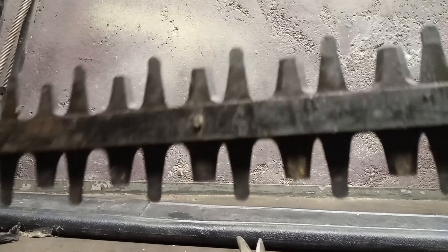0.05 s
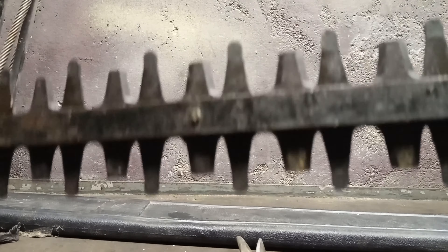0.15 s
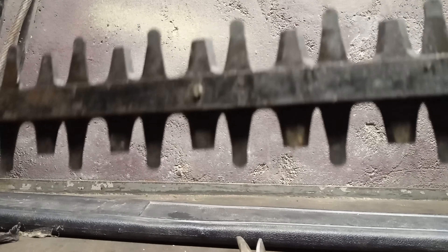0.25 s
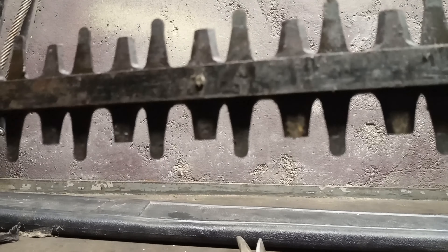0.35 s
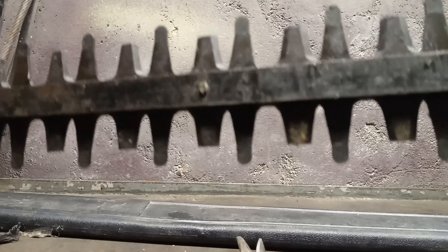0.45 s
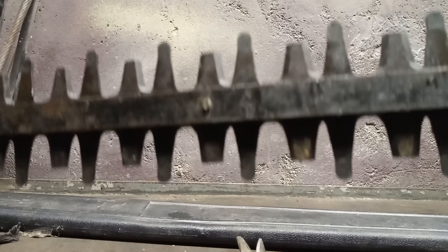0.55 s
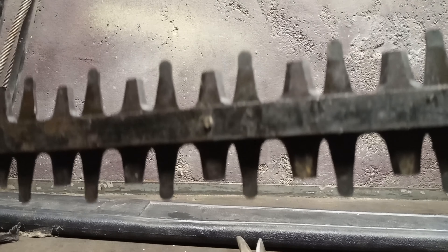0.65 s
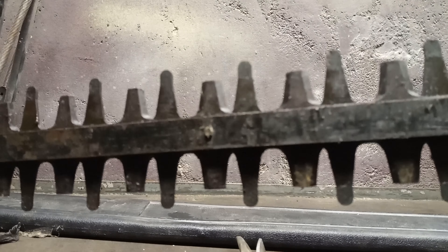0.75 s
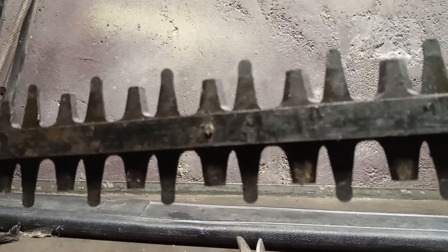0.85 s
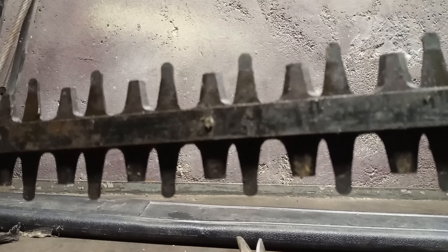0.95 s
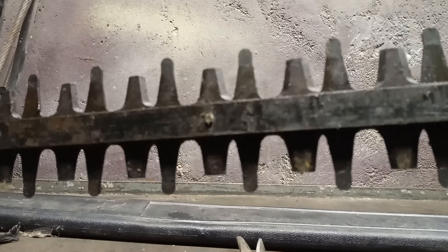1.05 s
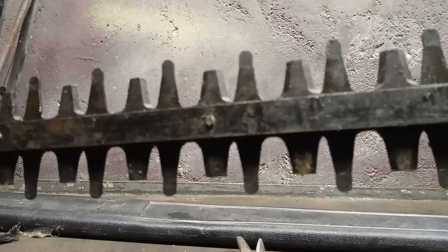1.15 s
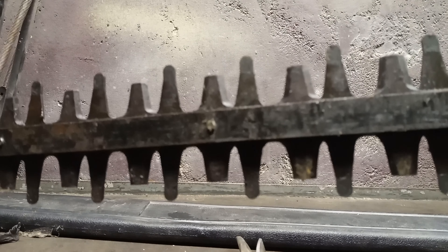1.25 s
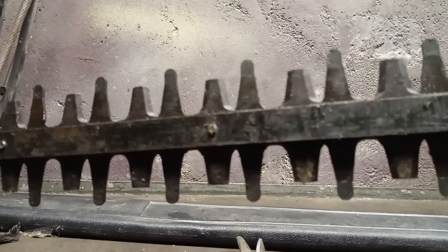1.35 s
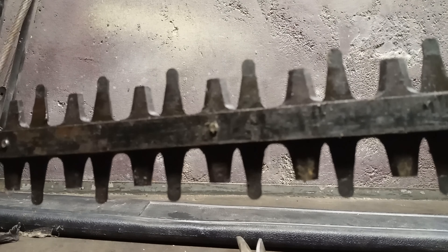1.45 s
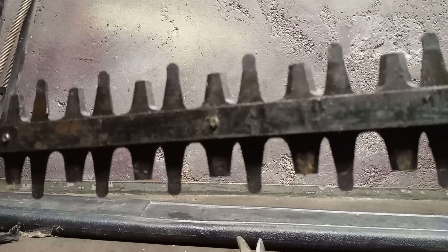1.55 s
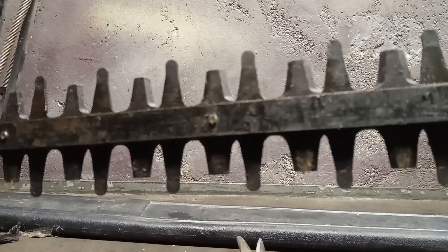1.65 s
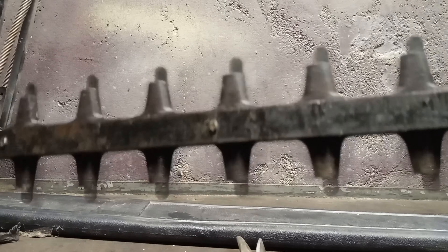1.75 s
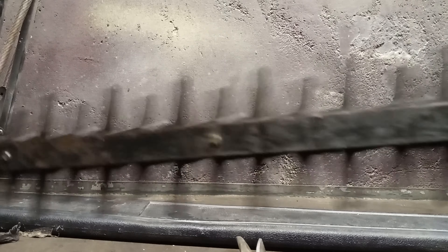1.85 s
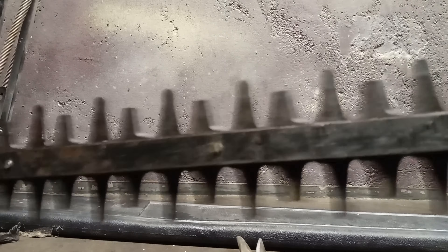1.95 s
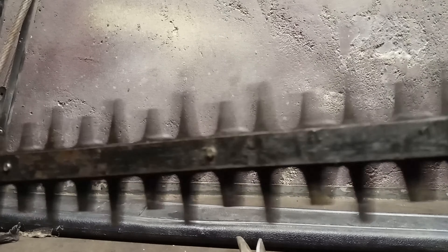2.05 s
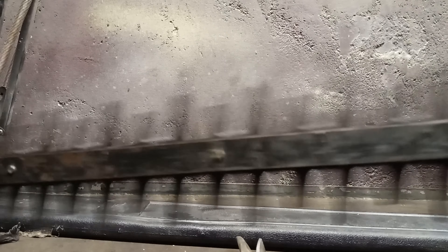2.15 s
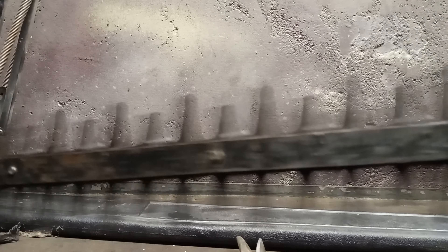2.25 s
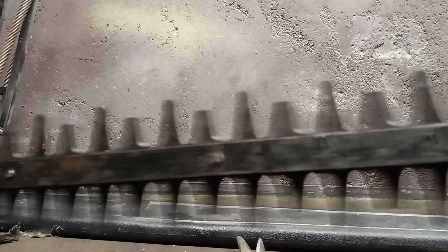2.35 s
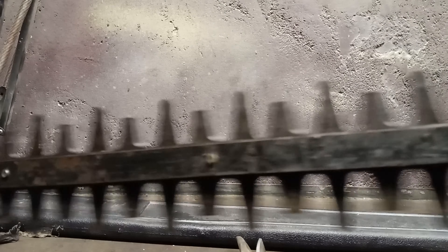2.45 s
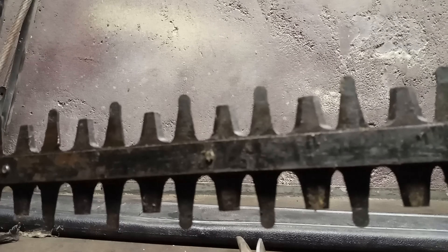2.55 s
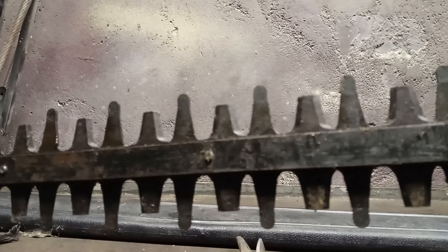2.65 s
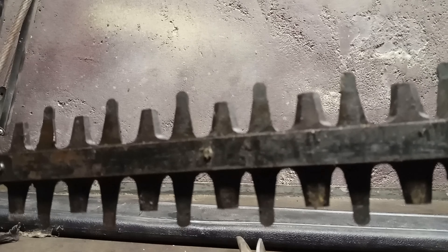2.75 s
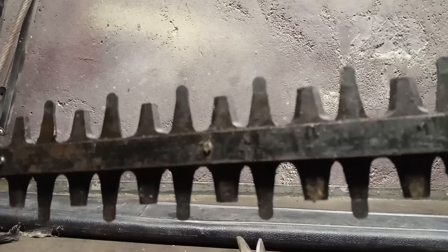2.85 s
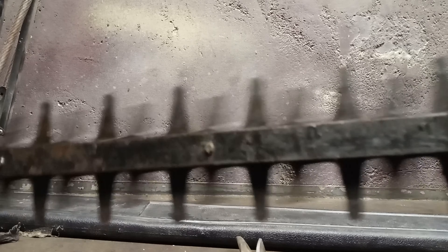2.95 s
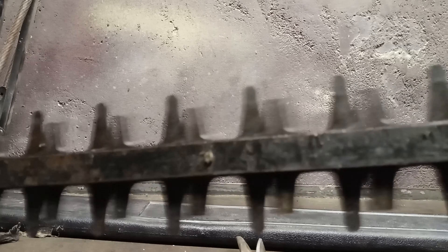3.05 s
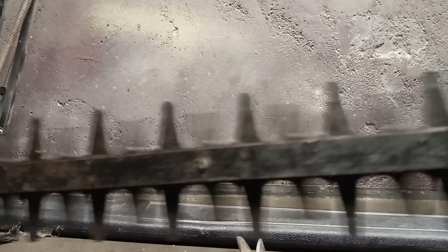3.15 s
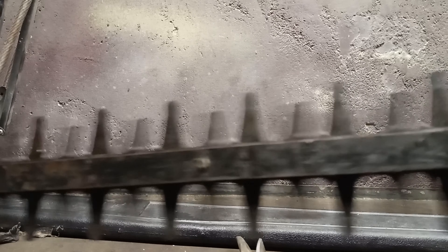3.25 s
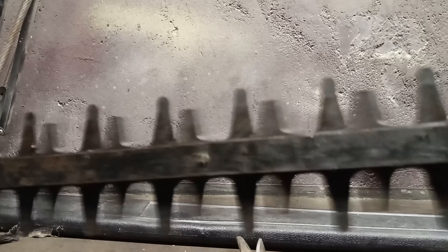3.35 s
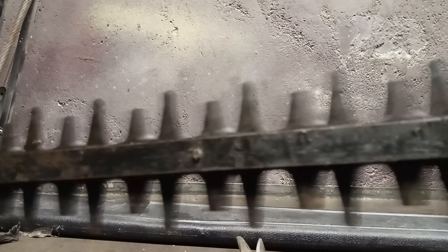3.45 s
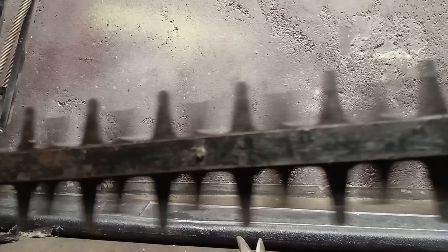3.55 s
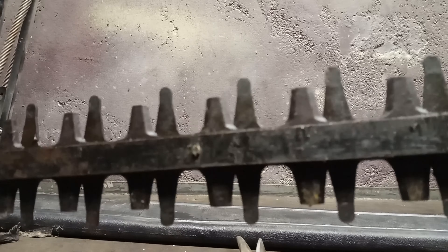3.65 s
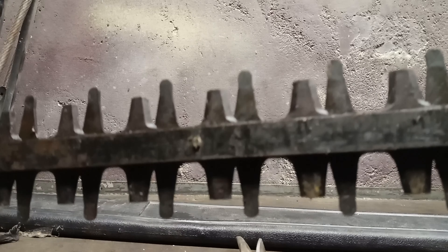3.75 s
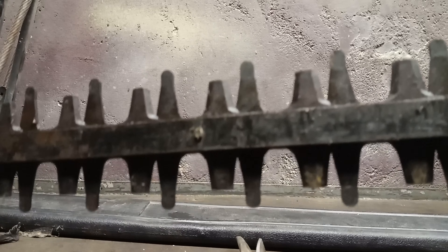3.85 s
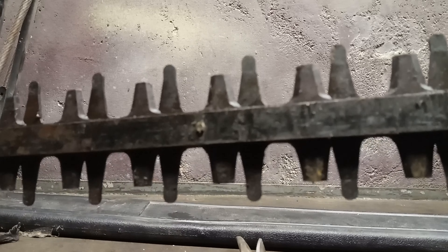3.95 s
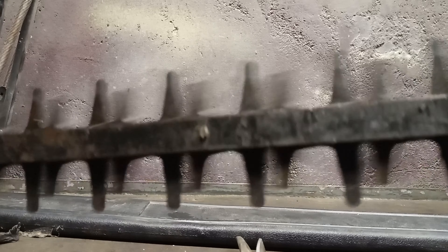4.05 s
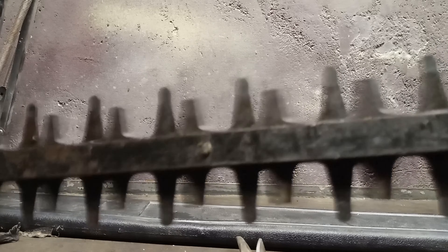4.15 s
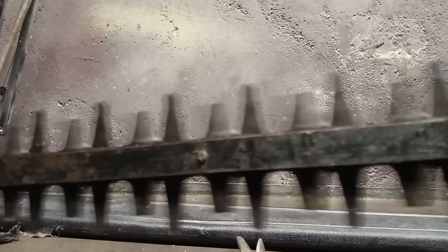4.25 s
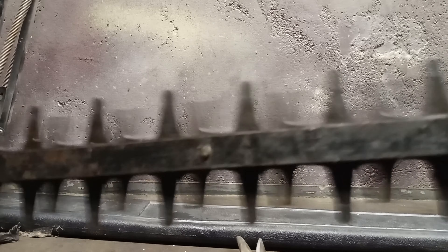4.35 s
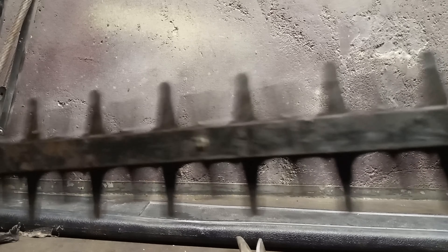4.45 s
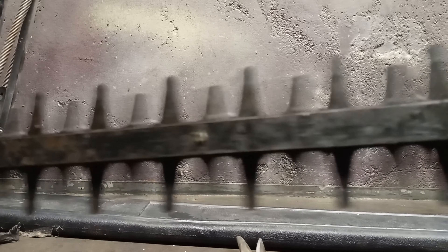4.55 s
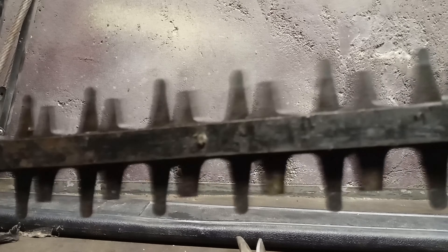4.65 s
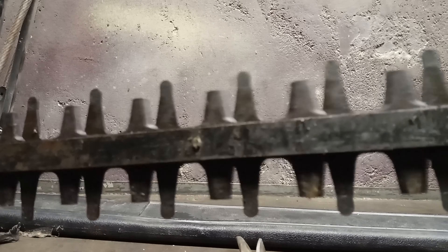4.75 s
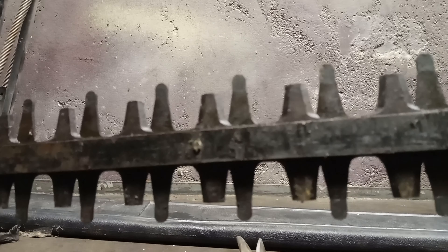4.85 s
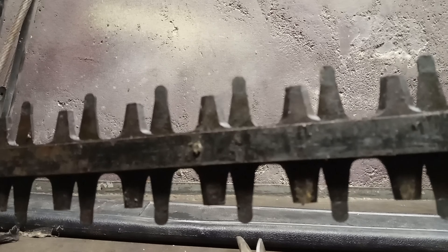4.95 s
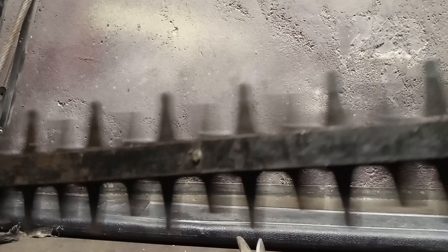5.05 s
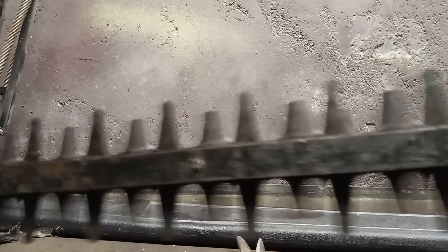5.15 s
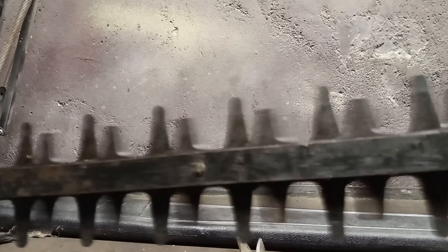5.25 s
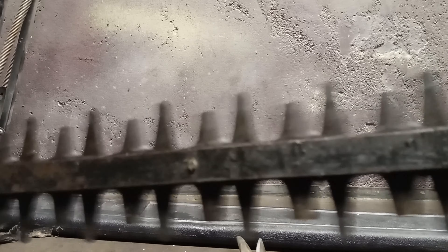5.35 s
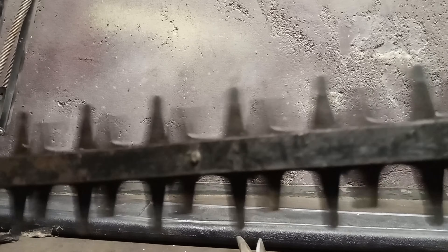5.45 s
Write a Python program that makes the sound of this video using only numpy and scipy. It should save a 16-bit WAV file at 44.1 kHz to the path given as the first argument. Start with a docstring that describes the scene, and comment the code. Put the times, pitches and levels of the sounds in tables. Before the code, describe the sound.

After light handling and a latch snap, a hedge trimmer starts and stops in four close bursts of whining, scraping metallic clatter.

```python
"""In a small workshop with hard walls, an electric hedge trimmer is handled, then run four times.
Hands tap its plastic housing and a latch snaps. On each run the gears whine up to speed, steel scrapes
on steel, and the blade clacks at each end of its stroke. One close microphone picks it all up,
and a fast limiter (an automatic volume control) squeezes the loud bursts."""
import sys
import numpy as np
from scipy import signal
from scipy.io import wavfile
from scipy.ndimage import uniform_filter1d

SR = 44100
rng = np.random.default_rng(int(sys.argv[2]) if len(sys.argv) > 2 else 0)


def int16_out(signal):
    """Quantize to a 16-bit WAV file."""
    q = np.round(np.clip(np.atleast_2d(signal).T, -1, 1) * 32767)
    wavfile.write(sys.argv[1], SR, q.astype(np.int16))


N = 243431

# The quiet noise of the room. Each row: frequency in Hz, level in dB.
ROOM_COLOUR = [(18, -61), (30, -38), (93, -3.5), (232, -15), (271, -10), (424, -15), (735, -20),
               (860, -19.5), (1010, -19.5), (3940, -23.5), (11500, -37), (15800, -24.5)]
# The echo of the walls. Each row: frequency in Hz, seconds to fade by 60 dB.
ECHO_TIMES = [(150, 0.42), (400, 0.24), (1040, 0.3), (2760, 0.31), (7280, 0.21), (14000, 0.12)]
# A short low hum. Each row: time in seconds, pitch in Hz, level in dB.
HUM_PATH = [(0, 138, -56), (.008, 132, -39), (.048, 146, -49), (.062, 145, -81)]
# Hands on the housing and switch. Each row: start in seconds, level in dB, centre frequency in Hz,
# hollow low part in dB, treble in dB, fade time in seconds.
HAND_TAPS = [(.006, -37, 1100, -55, -26.5, 0.0016), (0.019, -38.5, 1140, -51, -25.5, 0.013),
             (.048, -42.5, 850, -40, -20, 0.017), (0.067, -29.5, 1150, -53, -29, 0.021),
             (0.072, -27, 820, -49, -21, 0.0048), (.33, -46, 1500, 2, -23, .012),
             (0.962, -37.5, 1240, -5, -36, 0.0064), (0.997, -50, 1400, -33, -24, 0.003),
             (1.021, -39, 1496, -20.5, -25, 0.01), (1.099, -34.5, 1460, -8.5, -13, 0.0023),
             (1.107, -36, 1870, -31, -30, 0.013), (1.324, -43, 1730, -6, -17.5, 0.011),
             (1.346, -45, 1930, -28, -24, 0.036)]
# The ways the plastic housing rings. Each row: frequency in Hz, width in Hz, level in dB.
HOUSING_RINGS = [(426, 45, -3.5), (720, 66, -17), (797, 280, 11.5), (1066, 92, 7.5), (1310, 250, 5.5),
                 (1613, 77, 2), (2170, 260, 1.5), (3000, 290, -0.5), (2980, 280, 7), (4320, 440, 9.5),
                 (5200, 320, 12), (6050, 220, -3), (6830, 760, 7)]
# A latch snaps and settles. Each row: start in seconds, level in dB, fade time in seconds.
LATCH_SNAPS = [(0.3216, -5, 0.0024), (0.325, -36, 0.0029), (0.34, -54.5, 0.0025)]
# The tone of the latch. Each row: frequency in Hz, level in dB.
LATCH_COLOUR = [(180, -51), (300, -21), (812, -46), (1550, -6), (1830, -22.5), (2020, -3), (2860, -13.5),
                (3160, -5), (6350, -6), (12100, -25.5), (15800, -26.5)]
# The notes of the free blade. Each row: pitch in Hz, level in dB, seconds to fade by 60 dB.
BLADE_NOTES = [(2234, 0, .9), (2719, -8, .6), (2778, -3, 1.1), (4064, -10, .4)]
# A clack that leaves the blade ringing. Each row: start in seconds, level in dB.
RING_STARTS = [(3.82, -39)]
# The ways the gearbox and blade bar ring. Each row: frequency in Hz, width in Hz, level in dB.
BODY_RINGS = [(403, 71, 5), (751, 190, -3), (1162.5, 31, 2.5), (1620, 34, -1.5), (2220, 170, -35),
              (3170, 36, -31), (3085, 19, -2.5), (5130, 220, -23), (5730, 24, -48), (5940, 76, -0.5),
              (7140, 720, -4.5)]
# Start-up clunks. Each row: start in seconds, level in dB, centre and width in Hz, fade time in seconds.
START_CLUNKS = [(1.818, -13, 390, 403, 0.011), (2.996, 5.5, 784, 1110, 0.01), (3.005, 0.5, 480, 400, 0.016),
                (4.118, 10, 740, 504, 0.0053), (4.155, 3, 1120, 300, 0.019), (5.06, -4, 714, 910, 0.012),
                (5.095, -17, 1140, 392, 0.023)]
# Motor runs. Each row: switch-on, switch-off and standstill in seconds, full-speed pitch in Hz,
# speed-up and slow-down times in seconds, upward drift in Hz per second, whine level in dB,
# extra for the whine's third tone in dB, scrape level in dB.
MOTOR_RUNS = [(1.81, 2.456, 2.66, 931.7, .07, 0.13, 96, -19.5, 8.5, -19.5),
              (2.99, 3.608, 3.83, 973.3, 0.072, .17, 40.8, -19.5, 1, -18.5),
              (4.112, 4.713, 4.93, 990, .085, .165, 20, -20.5, 3.5, -18.5),
              (5.057, 5.57, 5.7, 977, 0.087, 0.22, 76, -21.5, -3, -19.5)]
# The tones of meeting gear teeth. Each row: multiple of the gear pitch, level in dB.
GEAR_TONES = [(1, -0.5), (2, -3.5), (3, -14)]
# How well the casing gives off those tones. Each row: frequency in Hz, level in dB.
CASING_COLOUR = [(250, -17), (600, -2.5), (1200, 4), (1600, -10), (2500, 2), (2950, 0)]
# The tone of sliding steel. Each row: frequency in Hz, level in dB.
SCRAPE_COLOUR = [(30, -44.5), (150, -13.5), (390, -9), (700, -9.5), (1400, -4.5), (2200, -3), (3700, -4),
                 (4900, -4), (8500, -11.5), (13300, -31), (15000, -22), (15800, -18.5)]
# The blade slams in its guide. Each row: time in seconds, stroke end (0 or 1), blow level in dB,
# weight (the level of the lower rings) in dB, rattle time in seconds.
BLADE_BLOWS = [(1.8128, 0, -3, -29, 0.0017), (1.8207, 0, -1.5, -7.5, .012), (1.8492, 0, -15.5, -13, 0.017),
               (1.8664, 1, -7, -9.5, 0.0067), (1.8845, 1, -12, -13.5, 0.0072),
               (1.9289, 0, -3.5, -12.5, 0.016), (1.9561, 0, -29, -21, 0.0026), (1.9684, 1, 3, -18, 0.0058),
               (2.0065, 0, -0.5, -11.5, 0.0073), (2.0313, 0, -19, -16, 0.016), (2.0445, 1, 2.5, -10, .0065),
               (2.0806, 0, -5, -13, 0.012), (2.1201, 1, 3.5, -9.5, 0.0054), (2.1583, 0, -1, -10.5, 0.0063),
               (2.1944, 1, -5, -8.5, 0.0045), (2.2206, 1, -14, -30, 0.0031), (2.2314, 0, -2, -10.5, 0.012),
               (2.2687, 1, 0.5, -8, 0.0025), (2.3045, 0, -4, -12, 0.014), (2.3406, 1, -1, -6.5, 0.0028),
               (2.379, 0, -5.5, -13, 0.022), (2.4152, 1, -11.5, -20, 0.013), (2.4512, 0, -1, -11, 0.0083),
               (2.4922, 1, -1.5, -3.5, 0.0058), (2.5308, 0, -19, -13, 0.01), (2.557, 0, 7.5, -12, 0.0065),
               (2.616, 0, -25, -25.5, 0.036), (2.9889, 0, -7, -7, 0.043), (2.9984, 0, -22.5, -12, .007),
               (3.0266, 0, -29, -28, 0.0037), (3.049, 0, 5.5, -10, .011), (3.088, 1, -11, -11.5, 0.026),
               (3.134, 0, 0.5, -16, 0.012), (3.17, 1, -3.5, -7, 0.011), (3.2102, 0, 2.5, -9, 0.013),
               (3.248, 1, 2, -19, 0.005), (3.286, 0, 2, -10, .0075), (3.3199, 1, 1, -9, 0.0058),
               (3.3563, 0, 2.5, -29, 0.0085), (3.3917, 1, 1.5, -9.5, 0.0073), (3.4294, 0, -1, -14, 0.0087),
               (3.464, 1, -3, -13, 0.0092), (3.5, 0, 2, -10, 0.0096), (3.5358, 1, -3, -15, 0.0079),
               (3.5722, 0, -0.5, -12.5, 0.013), (3.6087, 1, -1.5, -17, 0.0075), (3.6485, 0, 1.5, -11, 0.01),
               (3.692, 0, -24, -15, 0.0049), (3.708, 1, -13.5, -15.5, 0.017),
               (3.7595, 0, -20, -19.5, 0.0086), (3.774, 0, -16, -29, 0.004), (3.821, 1, -12.5, -12, 0.0076),
               (4.1183, 0, 6, 3.5, 0.01), (4.145, 0, -0.5, -4, 0.03), (4.1878, 0, -5, -19, 0.03),
               (4.242, 0, 6.5, -25, 0.0049), (4.2803, 1, -2, -8, 0.014), (4.3162, 0, -1, -27, 0.01),
               (4.3533, 1, -0.5, -10.5, 0.0078), (4.3887, 0, -0.5, -11, 0.0092),
               (4.4238, 1, 3.5, -15, 0.0046), (4.4593, 0, -2, -12.5, 0.015), (4.4948, 1, 1, -12, 0.0059),
               (4.5311, 0, -3, -15, 0.013), (4.565, 1, -4, -16, 0.011), (4.6016, 0, -4, -16, 0.012),
               (4.6367, 1, 0, -15, .0062), (4.674, 0, -2, -15, 0.011), (4.7078, 1, -3.5, -12.5, 0.0088),
               (4.7467, 0, -1, -10, 0.012), (4.783, 0, -15, -29, 0.017), (4.804, 1, -2.5, -6.5, 0.0047),
               (4.8617, 0, -14.5, -12, 0.0073), (4.9187, 1, -15, -19, 0.012), (5.0605, 0, -8, -6.5, 0.018),
               (5.0841, 0, -14, -15.5, 0.021), (5.1273, 0, -2.5, -7.5, 0.019), (5.1643, 0, 0, -2, 0.0034),
               (5.178, 0, -3.5, -23, 0.0098), (5.2148, 1, -2.5, -11, 0.008), (5.253, 0, 0, -22, 0.0096),
               (5.2885, 1, -5.5, -15, 0.0092), (5.3235, 0, -0.5, -9, 0.013), (5.3599, 1, 2.5, -16, 0.0056),
               (5.3958, 0, -3.5, -18, 0.011), (5.4294, 1, -4, -19, 0.0087), (5.465, 0, -1.5, -13, 0.011),
               (5.4988, 1, -2, -33, 0.007)]
# The tone of struck steel. Each row: frequency in Hz, level in dB.
BLOW_COLOUR = [(30, -39.5), (120, -17), (300, -13.5), (600, -13), (1400, -10.5), (2200, -7.5), (3700, -6.5),
               (4900, -4.5), (9000, -9), (13500, -24), (15000, -7), (15800, -16.5)]
# The two stroke ends. Each row: dB added to the gearbox thump, cover clunk, bar knock and tooth ring.
END_COLOURS = [(-13, 0.5, 1.2, -9.5), (-22, 3, 0.77, -1.5)]
# Added to those four levels: a change at low speed (less bar knock, more tooth ring), a random spread.
SLOW_DB, SCATTER_DB = (0.3, 1.5, -6, 5.5), (0.8, 0.83, 3.9, 1.5)
# The cover clunk, bar knock and tooth ring. Each row: frequency in Hz, width in Hz, level in dB.
RATTLE_RINGS = [(910, 930, 10.7), (2390, 840, 12.74), (4765, 1040, 13.3)]

START_HZ = 273.6  # gear pitch at switch-on
WOBBLE, COAST_WOBBLE = 0.012, 0.031  # unsteady share of the pitch, with power on and off
LOAD_S, LOAD_SAG, LOAD_DB = 0.011, 0.035, -8  # strained gears: build-up, share of pitch lost, level dip
RISE_S = (0.003, 0.0014)  # how long the rattle takes to build at each stroke end
PIN_LEAD_S, BOUNCE_S, PING_HZ = 0.009, 0.006, 1161.6  # end 1 only: early tick, late bounce, gearbox ping


def gain_of(db):
    """Turns decibels into a number to multiply by."""
    return 10 ** (np.asarray(db) / 20)


def evened(x):
    """Scales a signal to an average (rms) strength of 1."""
    return x / np.sqrt(np.mean(x ** 2) + 1e-20)


def read(points, hz):
    """Looks up a frequency in a table, sliding between rows on a musical scale."""
    freqs, values = np.transpose(points)
    return np.interp(np.log(hz + 1), np.log(freqs + 1), values)


def add(mix, start, sound):
    """Lays a sound into the mix at a start time in seconds."""
    part = mix[round(start * SR):][:len(sound)]
    part += sound[:len(part)]


def coloured(x, points):
    """Gives a sound the low-to-high balance in a table; white noise keeps its level."""
    log_gain = np.log(gain_of(read(points, abs(np.fft.fftfreq(8192, 1 / SR)))))
    taps = np.fft.ifft(np.exp(np.conj(signal.hilbert(log_gain)))).real[:4096]  # never rings early
    return signal.oaconvolve(x, taps / np.linalg.norm(taps))[:len(x)]


def resonate(x, hz, *widths):
    """Rings a sound at one frequency, once for each width in Hz; narrower rings longer."""
    for width in widths:
        x = signal.lfilter(*signal.iirpeak(hz, hz / width, SR), x)
    return x


def burst(t, fade_s):
    """Noise that starts at once and dies away."""
    return rng.standard_normal(len(t)) * np.exp(-t / fade_s)


def room_tone():
    """The faint, steady rumble and hiss of the room."""
    return gain_of(-53.5) * coloured(rng.standard_normal(N), ROOM_COLOUR)


def wall_echo(x):
    """Hard walls send back many small echoes, each frequency fading at its own speed."""
    echoes = np.zeros(SR // 2)
    slots = np.arange(200, len(echoes) - 20, 20)
    echoes[slots + rng.integers(0, 20, len(slots))] = rng.choice([-1., 1.], len(slots))
    hz, t, spectrum = signal.stft(echoes, SR, nperseg=256)
    fade = gain_of(-60 * t / read(ECHO_TIMES, hz)[:, None])
    tail = signal.istft(spectrum * fade, SR, nperseg=256)[1]
    return signal.fftconvolve(x, tail / np.linalg.norm(tail))[:N]


def low_hum():
    """A faint low tone, heard only in the first instant."""
    times, hz, db = np.transpose(HUM_PATH)
    t, out = np.arange(0, times[-1], 1 / SR), np.zeros(N)
    cycles = np.cumsum(np.interp(t, times, hz)) / SR
    add(out, 0, gain_of(np.interp(t, times, db)) * np.sin(2 * np.pi * cycles))
    return out


def hand_taps():
    """Short scuffs make the plastic housing ring, with a different tone for each spot touched."""
    t, out = np.arange(3000) / SR, np.zeros(N)
    for start, tap_db, centre_hz, hollow_db, treble_db, fade_s in HAND_TAPS:
        scuff = burst(t, fade_s) * np.minimum(t / 0.0081, 1)
        colour = sorted([(450, hollow_db), (max(centre_hz / 2, 711), -25.5), (centre_hz, 0),
                         (2 * centre_hz, -21.5), (4000, treble_db)])
        for hz, width, db in HOUSING_RINGS:
            ring = resonate(scuff, hz, width, 2 * width, 3 * width)
            add(out, start, gain_of(tap_db + db + read(colour, hz)) * ring / abs(ring).max())
    return out


def latch():
    """The latch snaps and settles in short, dry bursts of noise."""
    t, out = np.arange(2000) / SR, np.zeros(N)
    for start, db, fade_s in LATCH_SNAPS:
        add(out, start, gain_of(db) * burst(t, fade_s) * np.minimum(t / 0.003, 1))
    return coloured(out, LATCH_COLOUR)


def blade_ring():
    """The free blade sings on softly after the second run."""
    t, out = np.arange(SR // 2) / SR, np.zeros(N)
    for start, blow_db in RING_STARTS:
        for hz, db, ring_s in BLADE_NOTES:
            note = np.sin(2 * np.pi * (hz * t + rng.random()))
            add(out, start, gain_of(blow_db + db - 60 * t / ring_s) * note)
    return out


def trimmer_body(x):
    """The gearbox and bar ring along with the sound made inside them."""
    return x + sum(gain_of(db) * resonate(x, hz, width) for hz, width, db in BODY_RINGS)


def start_clunks():
    """Dull clunks and a short rasp sound as the motor starts."""
    t, out = np.arange(3000) / SR, np.zeros(N)
    for start, db, hz, width, fade_s in START_CLUNKS:
        jolt = burst(t, fade_s) * np.minimum(t / 0.0034, 1)
        clunk = resonate(jolt, hz, width, 2 * width)
        add(out, start, gain_of(db) * clunk / abs(clunk).max())
    return out


def gear_pitch(t, on, off, full_hz, spin_s, coast_s, drift):
    """How many gear teeth meet each second: it climbs with the power on, then falls away."""
    driven_s = np.clip(t, on, off) - on
    shortfall_hz = (full_hz - START_HZ) * np.exp(-(driven_s / spin_s) ** 1.35)
    return (full_hz + drift * driven_s - shortfall_hz) * np.exp(-np.maximum(t - off, 0) / coast_s)


def gear_strain():
    """Each blow at stroke end 1 strains the gears: a smooth bump that peaks at the blow."""
    age, out = np.arange(4000) / SR / LOAD_S, np.zeros(N + SR)
    for start, end, *_ in BLADE_BLOWS:
        add(out, start - LOAD_S, end * age * np.exp(1 - age))
    return out


def whine_and_scrape():
    """Gear teeth whine and the sliding blade scrapes, both following the motor's speed."""
    whine, rubbing, strains = np.zeros(N), np.zeros(N), gear_strain()
    for on, off, still, full_hz, spin_s, coast_s, drift, whine_db, third_db, scrape_db in MOTOR_RUNS:
        t = np.arange(on, still, 1 / SR)
        hz = gear_pitch(t, on, off, full_hz, spin_s, coast_s, drift)
        slow = np.clip(1 - hz / full_hz, 0, 1)
        coasting = np.clip((t - off) / 0.02, 0, 1)
        strain = strains[round(on * SR):][:len(t)]
        wobble, flutter = uniform_filter1d(rng.standard_normal((SR, 2)), size=200, axis=0)[:len(t)].T
        wobble = (WOBBLE + (COAST_WOBBLE - WOBBLE) * coasting) * evened(wobble)
        cycles = np.cumsum(hz * (1 - LOAD_SAG * strain + wobble)) / SR
        tone = np.zeros(len(t))
        for multiple, db in GEAR_TONES:
            db += (multiple == 3) * third_db + read(CASING_COLOUR, multiple * hz)
            db -= (multiple == 1) * 5.5 * slow
            tone += gain_of(db) * np.sin(2 * np.pi * multiple * cycles)
        # at low speed the lowest tone gives way to the chatter of loose teeth
        chatter = rng.standard_normal(SR)[:len(t)] * np.exp(-(cycles % 1) / 0.37)
        chatter = evened(resonate(chatter, 580, 500, 1000))
        gears = gain_of(LOAD_DB * strain) * tone + gain_of(-6.5) * 2 * slow * chatter
        fade_in, fade_out = np.clip((t - on) / 0.016, 0, 1), np.clip((still - t) / 0.093, 0, 1)
        add(whine, on, gain_of(whine_db + 3.74 * evened(flutter)) * gears * fade_in * fade_out)
        rub_db = scrape_db + 2 * np.log2(hz / full_hz)  # 2 dB louder at twice the speed
        add(rubbing, on, gain_of(rub_db) * fade_out * np.clip((t - on) / 0.0017, 0, 1))
    # rubbing steel catches in small uneven jolts
    grit = gain_of(0.81 * evened(uniform_filter1d(rng.standard_normal(N), 90)))
    return whine, coloured(rubbing * evened(grit * rng.standard_normal(N)), SCRAPE_COLOUR)


def blade_clacks():
    """Each blow is a bright crack, a push on the gearbox and a rattle that sets off three rings."""
    t = np.arange(2000) / SR
    rattles, pushes, cracks = np.zeros((4, N)), np.zeros((2, N)), np.zeros(N)
    for start, end, blow_db, weight_db, rattle_s in BLADE_BLOWS:
        nearest_run = min(MOTOR_RUNS, key=lambda run: abs(start - (run[0] + run[2]) / 2))
        on, off, _, full_hz, spin_s, coast_s, drift, *_ = nearest_run
        slow = 1 - gear_pitch(start, on, off, full_hz, spin_s, coast_s, drift) / full_hz
        colour_db = END_COLOURS[end] + slow * np.array(SLOW_DB) + SCATTER_DB * rng.standard_normal(4)
        thump_db, *rings_db = colour_db + [0.44 * blow_db, weight_db, weight_db, blow_db]
        rise_s = RISE_S[end]
        shape = np.exp(-(t / rattle_s) ** 1.555) * np.minimum(t / rise_s, 1) ** 2
        if end == 1:  # the blade bounces once
            late = np.maximum(t - BOUNCE_S, 0)
            shape = shape ** 2 + gain_of(-7) * np.exp(-late / rattle_s) * np.minimum(late / rise_s, 1)
        roughness = gain_of(1.3 * evened(uniform_filter1d(rng.standard_normal(len(t)), 60)))
        for track, db in zip(rattles, [blow_db, *rings_db]):  # the steel itself, then the three rings
            hits = shape * roughness * rng.standard_normal(len(t))
            hits *= np.linalg.norm(shape) / np.linalg.norm(hits)
            add(track, start - rise_s / 2, gain_of(db) * hits)
        pin_tick = end * gain_of(-11 + blow_db / 2) * burst(t, 0.003)  # the drive pin, just ahead
        add(rattles[0], start - PIN_LEAD_S, pin_tick)
        add(pushes[end], start, gain_of(thump_db) * t / 0.00069 * np.exp(-t / 0.00057))
        add(cracks, start, gain_of(blow_db) * burst(t, 0.0022))
    steel = gain_of(-1) * coloured(rattles[0], BLOW_COLOUR)
    crack = gain_of(-11) * resonate(cracks, 10500, 4500)
    thump = gain_of(20.5) * resonate(resonate(pushes.sum(0), 433, 300), 300, 350)
    ping = gain_of(44) * resonate(pushes[1], PING_HZ, 53, 300)
    rings = sum(gain_of(db) * resonate(track, hz, width, 2 * width)
                for track, (hz, width, db) in zip(rattles[1:], RATTLE_RINGS))
    return steel + crack + thump + ping + rings


def scene():
    """Mixes the close trimmer, the hands, the echo and the room; both channels are the same."""
    near = gain_of(13.5)
    whine, scrape = whine_and_scrape()
    whine = near * trimmer_body(whine)
    clatter = near * trimmer_body(scrape + blade_clacks() + start_clunks())
    handling = hand_taps() + low_hum() + latch()
    echo = wall_echo(gain_of(-13.5) * whine + gain_of(-16) * clatter + gain_of(-10.5) * handling)
    return np.tile(room_tone() + echo + handling + blade_ring() + whine + clatter, (2, 1))


def reduce_noise(x):
    """Turns each frequency down as it nears its usual quiet level, which cuts echoes short."""
    spectrum = signal.stft(x, nperseg=512, noverlap=384)[2]
    power = uniform_filter1d(uniform_filter1d(abs(spectrum) ** 2, size=7, axis=0), size=5, axis=1)
    quiet = np.percentile(power, 15, axis=1, keepdims=True)
    kept_power = np.maximum(1 - 5.9 * quiet / (power + 1e-20), gain_of(-21.5))
    return signal.istft(spectrum * np.sqrt(kept_power), nperseg=512, noverlap=384)[1][:N]


def cut_treble(x, hz, length, beta):
    """Removes the highest frequencies, above hz."""
    return signal.oaconvolve(x, signal.firwin(length, hz, window=("kaiser", beta), fs=SR)[None], "same")


def limiter(x, threshold_db=-14, release_s=0.14):
    """Looks a little ahead, takes off most of the level above the threshold and lets go fast."""
    level_db = 10 * np.log10(abs(uniform_filter1d(x[0] ** 2, size=180, origin=-60)) + 1e-12)
    over_db = np.maximum(level_db - threshold_db, 1e-3)
    fade = np.arange(N) / SR / release_s
    held_db = np.exp(np.maximum.accumulate(np.log(over_db) + fade) - fade)  # jumps up, sinks back
    return x / gain_of(0.8 * uniform_filter1d(held_db, size=160))


def record(dry):
    """The microphone lowers the noise, loses the highest treble and squeezes the loud bursts."""
    cleaned = np.array([reduce_noise(channel) for channel in dry])
    squeezed = limiter(cut_treble(cleaned, hz=15900, length=401, beta=7))
    rounded = squeezed / (1 + squeezed ** 6) ** (1 / 6)  # softly flattens the tallest peaks
    return cut_treble(rounded, hz=17065, length=511, beta=9)


dry = scene()
out = record(dry)
int16_out(out)
```